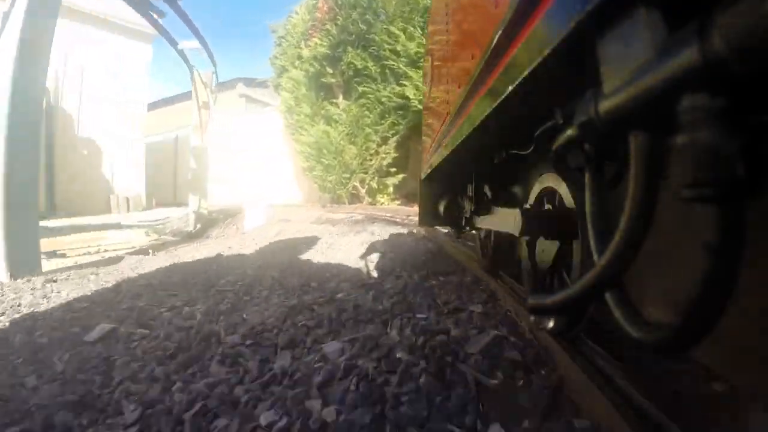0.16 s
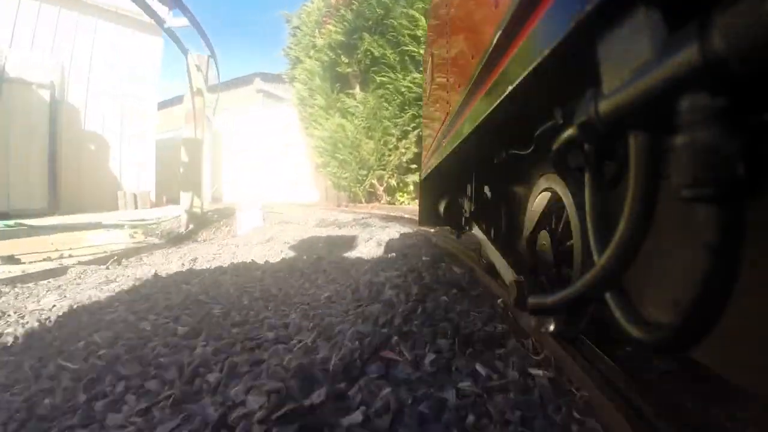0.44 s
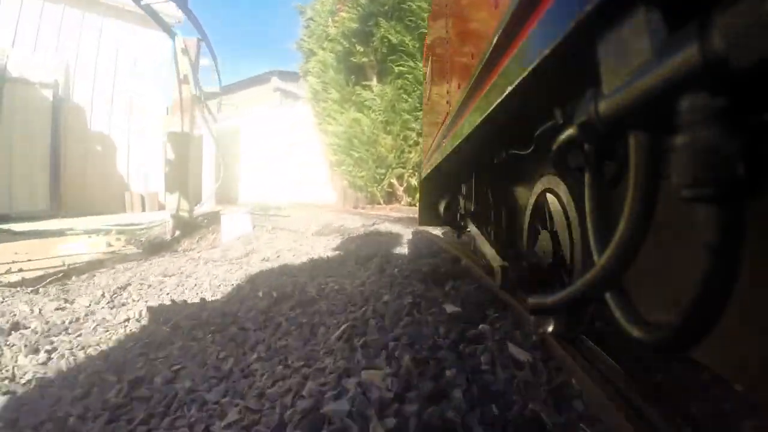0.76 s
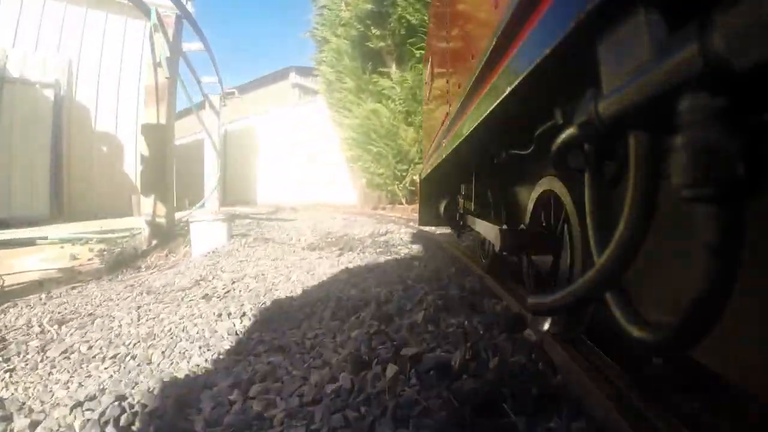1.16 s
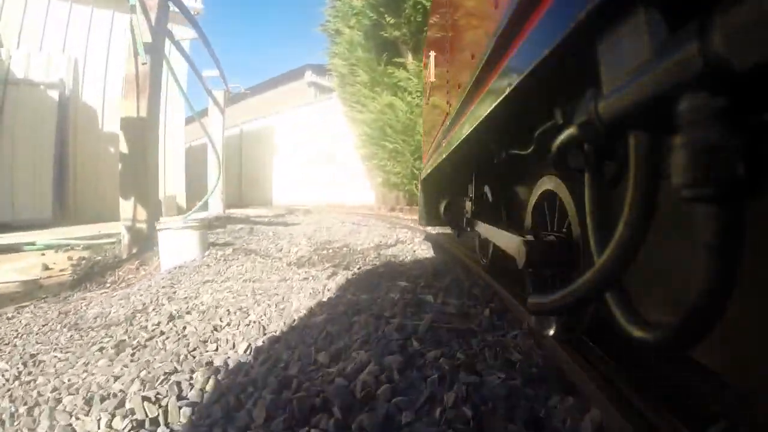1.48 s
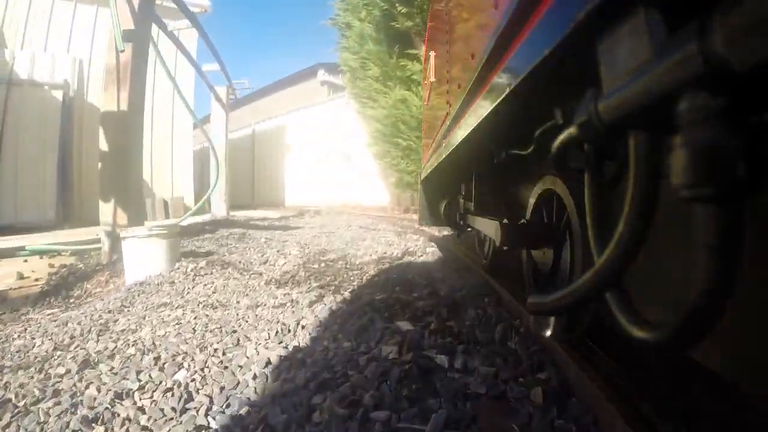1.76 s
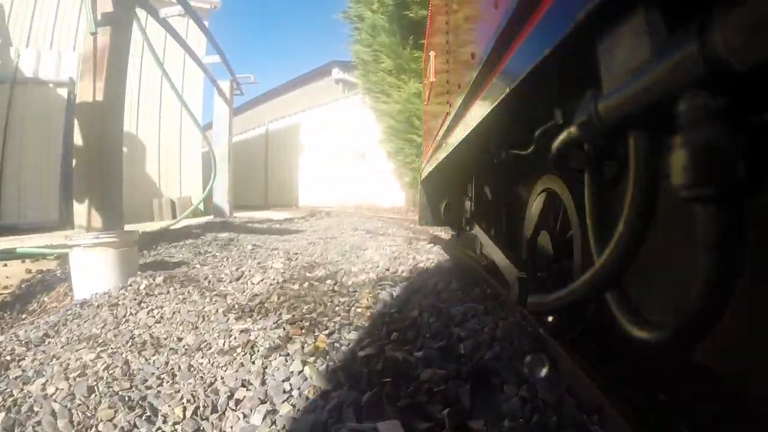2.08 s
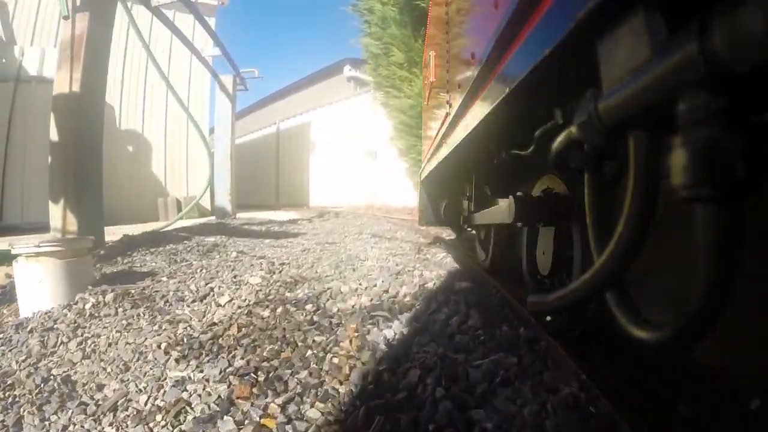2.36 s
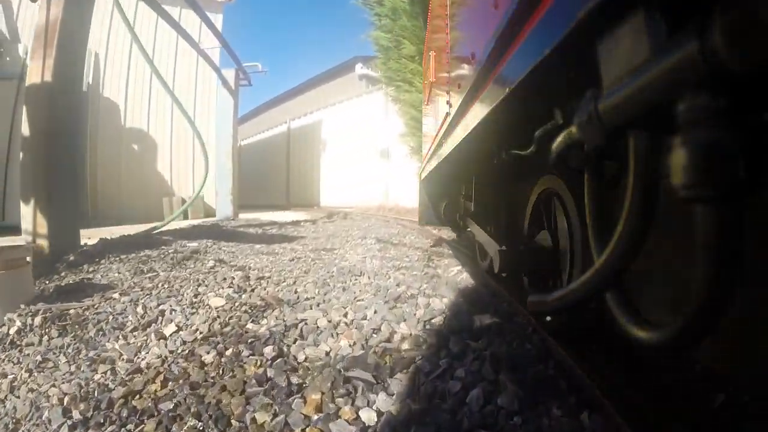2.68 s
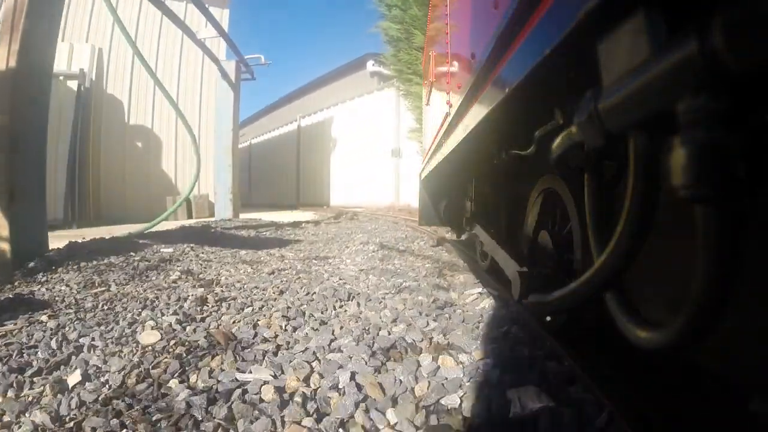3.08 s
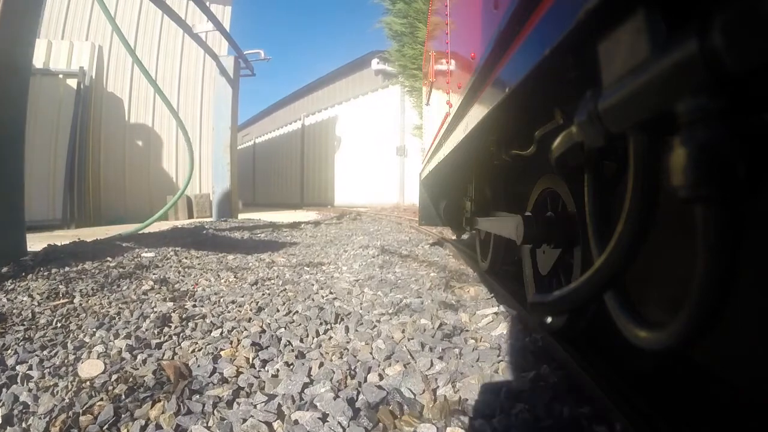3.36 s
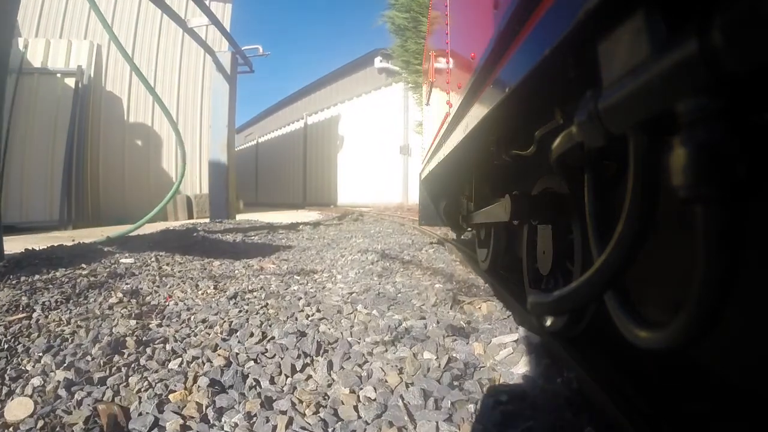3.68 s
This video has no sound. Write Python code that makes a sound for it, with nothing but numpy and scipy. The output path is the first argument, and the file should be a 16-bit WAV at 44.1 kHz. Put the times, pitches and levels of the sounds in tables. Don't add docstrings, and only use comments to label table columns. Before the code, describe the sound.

A miniature steam locomotive rolls along track, clanking and rumbling, with a faint muffled steam hiss later

```python
import sys
import numpy as np
from scipy import signal
from scipy.fft import rfft, irfft
from scipy.io import wavfile
from scipy.ndimage import uniform_filter1d

SR = 44100
rng = np.random.default_rng(int(sys.argv[2]) if len(sys.argv) > 2 else 0)


def store_pcm(level_fs):
    pcm = np.round(np.clip(level_fs, -1, 1) * 32767).astype(np.int16)
    wavfile.write(sys.argv[1], SR, np.atleast_2d(pcm).T)


def volts_from_decibels(level):
    exponent = np.asarray(level, float) / 20
    return 10 ** exponent


N = 168903
POINTS_END_S = 1.3

# f/Hz, level/dB, t60/s
FRAME_MODES = [(132, -4, 0.14), (220, -13.5, 0.48), (264, -6.5, 0.049), (293.6, 3.5, 0.085),
               (336.5, -7.5, 0.037), (394.4, -11, 0.069), (438.5, -5, 0.049), (505.3, -8.5, 0.13),
               (543, -16, 0.31), (639.4, -16.5, 0.19)]
# f/Hz, level/dB, t60/s
CASE_MODES = [(959, 2, 0.9), (1147, -1, 0.067), (1286, -5.5, 0.088), (1546, -3, 0.031),
              (1740, -16.5, 0.015), (1950, -1, 0.089), (2330, -16, 0.033), (2460, -2.5, 0.078),
              (3267, -12.5, 0.045), (3996, -13, 0.027), (4700, -22.5, 0.041), (5370, -8.5, 0.055)]
# t/s, steam level/dB, chatter level/dB
STEAM_AND_CHATTER = [
    (0, -68, -33.5),
    (.8, -71.5, -37),
    (1.3, -72, -42.5),
    (1.5, -71, -44),
    (2.2, -60.5, -41),
    (2.65, -61.5, -41.5),
    (3, -60, -44.5),
    (3.83, -59.5, -57),
]


def unit(x):
    return x / np.sqrt(np.mean(x ** 2))


def curve(rows, axis=1):
    rows = np.array(rows)
    return np.interp(np.arange(N) / SR, rows[:, 0], rows[:, axis])


def walk(rate_hz):
    k = int(SR / rate_hz)
    steps = np.repeat(rng.standard_normal(N // k + 3), k)
    slewed = uniform_filter1d(uniform_filter1d(steps, k), k)
    return unit(slewed[k:N + k])


def ring(x, hz, t60_s):
    r = np.exp(-np.log(1000) / (max(t60_s, .0012) * SR))
    w = 2 * np.pi * hz / SR
    return signal.lfilter([0, r * np.sin(w)], [1, -2 * r * np.cos(w), r * r], x)


def dull(x, hz, order=4, kind="low"):
    return signal.sosfilt(signal.butter(order, hz, kind, fs=SR, output="sos"), x)


def colour(x, tone, peaks=()):
    f = np.fft.rfftfreq(len(x), 1 / SR) + 1
    tone = np.array(tone)
    gain = volts_from_decibels(np.interp(np.log(f), np.log(tone[:, 0]), tone[:, 1]))
    gain = gain * np.clip(f / tone[0, 0], 0, 1) ** 2
    bumps = 1 + sum(volts_from_decibels(db) / (1 + (2 * (f - hz) / w) ** 2) for hz, w, db in peaks)
    return irfft(rfft(x) * gain * bumps, len(x))


def grit(per_s, spread_db):
    hit = rng.random(N) < per_s / SR
    return unit(hit * rng.standard_normal(N) * volts_from_decibels(spread_db * rng.exponential(size=N)))


def add(out, at_s, x):
    i = max(int(at_s * SR), 0)
    out[i:i + len(x)] += x[:N - i]


def mode_weights(count, spread_db):
    return volts_from_decibels(spread_db * rng.standard_normal((count, 16)))


def bursts(events, size, spread_db):
    t = np.arange(size) / SR
    noise = rng.standard_normal((len(events), size))
    weights = mode_weights(len(events), spread_db)
    for (s, db, length_s, *hz), n, w in zip(events, noise, weights):
        attack = np.minimum(t / 0.00054, 1)
        tail = 0.36 * np.exp(-t / (1.8 * length_s))
        shape = attack * np.clip(1.6 - 0.9 * t / length_s, 0, 1) + tail
        yield s, db, n * np.abs(n) ** 0.16 * shape, w, hz


def sway():
    # t/s, length/s, level/dB
    swing_spells = [(-.05, 0.21, -23.5), (0.714, 0.12, -24), (0.85, 0.13, -25), (1.07, 0.23, -32),
                    (1.568, 0.17, -27), (1.765, 0.19, -36), (2.168, 0.035, -22), (2.355, 0.17, -24.5),
                    (2.536, 0.17, -19.5), (2.802, 0.24, -21.5), (3.19, 0.099, -25), (3.32, 0.17, -25.5),
                    (3.483, 0.22, -30.5)]
    pitch_hz, wander_hz, rest_db, edge_s, flutter_db = 87, 2.28, -33, 0.036, 1.5
    t = np.arange(N) / SR
    spells = sum(volts_from_decibels(db) * ((t > s) & (t < s + length_s)) for s, length_s, db in swing_spells)
    size = volts_from_decibels(rest_db) * volts_from_decibels(3.7 * walk(8.7)) + uniform_filter1d(spells, int(edge_s * SR))
    phase = 2 * np.pi * np.cumsum(pitch_hz + wander_hz * walk(19)) / SR
    return np.sqrt(2) * np.sin(phase) * size * volts_from_decibels(flutter_db * walk(24.57))


def low_rise_db():
    return 3.5 * (np.arange(N) / SR - 1.9)


def rolling():
    # t/s, level/dB
    rolling_load = [
        (0, -16.5),
        (.5, -19),
        (1.05, -20),
        (1.2, -25),
        (1.5, -22.5),
        (2.1, -22),
        (2.8, -20),
        (3.15, -25.5),
        (3.83, -31.5),
    ]
    mode_flutter_db, roll_flutter_db, wheel_bumps_per_s = 1.0, 1.0, 120
    push = 0.62 * rng.standard_normal(N) + .35 * grit(wheel_bumps_per_s, 1.0)
    push = push * volts_from_decibels(curve(rolling_load) + roll_flutter_db * walk(17))
    rise_db = low_rise_db()
    out = np.zeros(N)
    for hz, db, t60_s in FRAME_MODES:
        level_db = db + mode_flutter_db * walk(10) + rise_db * (hz < 230)
        out += volts_from_decibels(level_db) * ring(push, hz, t60_s) * np.sqrt(30 / (t60_s * SR))
    return out * volts_from_decibels(-3.5)


def rumble():
    low = unit(dull(rng.standard_normal(N), 68, order=2))
    return volts_from_decibels(-44.5 + low_rise_db() + 2.8 * walk(16)) * low


def chatter():
    per_s, spread_db, flutter_db = 260, 1.2, 2
    shakes = uniform_filter1d(np.abs(grit(per_s, spread_db)), int(.003 * SR))
    level = volts_from_decibels(curve(STEAM_AND_CHATTER, axis=2) + 1.3 * walk(25))
    noise = rng.standard_normal(N) * (unit(shakes) + 1.21) * level
    out = np.zeros(N)
    for hz, db, t60_s in CASE_MODES:
        mode = ring(noise * volts_from_decibels(db + flutter_db * walk(14)), hz, t60_s * 0.19)
        out += mode * np.sqrt(30 / (t60_s * SR))
    return out * volts_from_decibels(-2.5)


def clanks():
    # t/s, peak level/dB, rattle length/s, f/Hz of main part
    point_clanks = [(.0528, -14, 0.0032, 1450), (.0977, -17, 0.0035, 2540), (.106, -18, 0.0048, 2440),
                    (.1195, -16, 0.0028, 2560), (.1286, -11.5, 0.0045, 2420), (.1316, -14, .008, 2000),
                    (.143, -20, 0.0046, 2560), (.1935, -34, 0.0031, 2600), (.2518, -11, 0.0018, 2460),
                    (.2887, -24, .005, 2070), (.3232, -19, 0.0067, 2010), (.362, -19, 0.012, 2710),
                    (.3701, -3, 0.0029, 2520), (.4638, -16.5, 0.0048, 1940), (.4823, -10.5, 0.0037, 2000),
                    (.5097, -21, 0.0034, 1900), (.5297, -3.5, 0.0044, 2557), (.546, -21, 0.0035, 2520),
                    (.5526, -11, 0.0053, 2550), (.6459, -12.5, 0.0058, 2540), (.6754, -17, .004, 1300),
                    (.6928, -20, 0.0087, 2530), (.7108, -6.5, 0.0037, 2570), (.7187, -5, 0.0028, 2540),
                    (.7866, -23.5, 0.0037, 1900), (.852, -19, 0.0073, 1970), (.8594, -16, 0.0075, 2570),
                    (.8804, -20, 0.0067, 2550), (.8889, -15, .008, 1990), (.9492, -17.5, 0.0037, 2600),
                    (.9607, -22, .005, 1920), (1.0136, -5.5, 0.0055, 2460), (1.0212, -4.5, 0.0016, 2646),
                    (1.0256, -1.5, 0.0032, 2554), (1.0422, -5, 0.0022, 2560), (1.066, -21, 0.0023, 2000),
                    (1.0874, -16.5, 0.0074, 2470), (1.1478, -18.5, .006, 1900),
                    (1.1882, -6.5, 0.0032, 2580), (1.2096, -21, 0.0051, 2600)]
    # t/s, peak level/dB, f/Hz
    plain_knocks = [(1.2456, -21, 2270), (1.281, -31, 2550), (1.335, -36, 1950), (1.381, -24.5, 1990),
                    (1.4206, -21.5, 2500), (1.5451, -28.5, 2520), (1.5704, -12.5, 2510),
                    (1.6465, -14, 2050), (1.8135, -14, 2450), (1.8657, -19.5, 2570), (1.8842, -16.5, 1570),
                    (1.9313, -27, 1910), (1.9726, -26, 2000), (1.9911, -18.5, 1940), (2.0669, -26, 1470),
                    (2.0798, -16.5, 1920), (2.2191, -31, 1960), (2.2311, -18.5, 2620), (2.254, -16.5, 1890),
                    (2.2824, -25, 2410), (2.3105, -23, 1920), (2.3423, -24, 2490), (2.386, -8.5, 2550),
                    (2.477, -22, 1490), (2.5399, -25, 1950), (2.5673, -20.5, 2600), (2.6155, -12, 2560),
                    (2.6396, -10, 2460), (2.703, -17.5, 1980), (2.7912, -19, 1510), (2.8841, -15.5, 2030),
                    (2.9803, -17.5, 2530), (3.0215, -23, 1980), (3.209, -21, 2540), (3.2969, -14, 1974),
                    (3.5306, -20, 1940), (3.5482, -14, 2430), (3.738, -21.5, 2510)]
    knock_s, mix_spread_db, detune = .003, 2.5, 0.017
    crack_db, part_db, thud_t60_s = -5, 3, .004
    events = point_clanks + [(s, db, knock_s, hz) for s, db, hz in plain_knocks]
    out = np.zeros(N)
    for s, db, burst, w, (part_hz,) in bursts(events, size=4000, spread_db=mix_spread_db):
        plain = s > POINTS_END_S
        case = np.zeros(len(burst))
        for g, o, (hz, mode_db, t60_s) in zip(w, w[::-1], CASE_MODES):
            mode = ring(burst, hz * (1 + detune * np.log(o)), min(t60_s, .07) * 0.92)
            case += g * volts_from_decibels(mode_db) * mode / np.sqrt(t60_s)
        crack = volts_from_decibels(crack_db + 1.8 * plain) * w[-1] * unit(ring(burst, 2900, 0.00083))
        part = volts_from_decibels(part_db - 4.5 * plain) * unit(ring(burst, part_hz, 0.026))
        thud = volts_from_decibels(-4 if plain else -16) * unit(ring(burst, 1200, thud_t60_s))
        x = unit(case) + crack + part + thud
        add(out, s - .0006, x / np.abs(x).max() * volts_from_decibels(db))
    return out


def ticks():
    # t/s, peak level/dB
    bright_ticks = [(0.074, -56.5), (0.1072, -47.5), (0.123, -36.5), (0.1335, -28.5), (0.145, -41.5),
                    (0.323, -40.5), (0.481, -48.5), (0.51, -41), (0.5184, -47.5), (0.5304, -44),
                    (0.5554, -39.5), (0.6922, -49.5), (0.7176, -44), (0.7336, -42.5), (0.8804, -46),
                    (0.9597, -41), (1.0882, -59.5), (1.148, -42.5), (1.2171, -57)]
    # t/s, peak level/dB before a 16 dB cut
    late_ticks = [
        (1.3505, -47.5),
        (1.6425, -42),
        (1.6927, -36.5),
        (1.8107, -31),
        (2.092, -33),
        (2.168, -48),
        (2.241, -33),
        (2.4564, -33),
        (2.6103, -30),
        (2.7004, -42),
    ]
    # t/s, peak level/dB
    dull_ticks = [
        (0.0521, -46),
        (0.3604, -45),
        (0.852, -52.5),
        (0.8646, -49),
        (1.0156, -42),
        (1.0192, -51),
        (1.0284, -44.5),
        (1.0442, -50),
    ]
    # f/Hz, level/dB
    tick_tone = [(2500, 2.5), (4800, 2.5), (6500, -12.5), (8800, -19.5), (12000, -32), (13500, -32.5),
                 (15000, -23.5)]
    tick_s, bracket_hz, bracket_t60_s, bracket_db = 0.0045, 1870, .12, -15
    bright = bright_ticks + [(s, db - 16) for s, db in late_ticks]
    events = [(s, db, tick_s) for s, db in bright + dull_ticks]
    out = np.zeros(N)
    for k, (s, db, burst, w, _) in enumerate(bursts(events, size=2000, spread_db=2.5)):
        x = dull(burst, 5100)
        if k < len(bright):
            top_ring = ring(burst, min(9000 * w[1], 15000), .004)
            x = x + (burst - x) * w[0] * 0.83 + 0.019 * top_ring
        add(out, s - .0012, x * volts_from_decibels(db))
    bracket = dull(ring(out, bracket_hz, bracket_t60_s), 2 * bracket_hz)
    return colour(out, tick_tone) * volts_from_decibels(17.5) + volts_from_decibels(bracket_db) * bracket


def thumps():
    # t/s, peak level/dB, f/Hz
    joint_knocks = [(0.069, 4, 546), (0.287, 2, 285), (0.387, 7, 305), (0.468, 9, 291), (0.495, -4, 263),
                    (0.529, -5, 298), (0.648, -0.5, 520), (0.779, -3, 304), (0.857, 4, 276),
                    (1.07, -2.5, 306), (1.398, -3, 309), (1.574, 3, 293), (1.648, 8, 293),
                    (1.873, 2.5, 282), (1.957, 1, 290), (2.051, 6, 294), (2.232, 4.5, 227.4),
                    (2.385, 5.5, 292.4), (2.475, -6, 279), (2.571, 0, 288), (2.64, 6, 289), (2.726, 2, 304),
                    (2.972, -2.5, 251), (3.212, 1.5, 272.4), (3.551, -8, 297)]
    body_db, ring_scale, spread_db = -4, .6, 4
    blow = np.zeros(6000)
    blow[:30] = 1
    out = np.zeros(N)
    for (s, db, hz), w in zip(joint_knocks, mode_weights(len(joint_knocks), spread_db)):
        swell = unit(ring(ring(blow, hz, 0.027), hz, 0.11))
        body = sum(g * volts_from_decibels(mode_db) * f * ring(blow, f, t60_s * ring_scale)
                   for g, (f, mode_db, t60_s) in zip(w, FRAME_MODES))
        x = swell + volts_from_decibels(body_db) * unit(body)
        add(out, s + 0.00032, x / np.abs(x).max() * volts_from_decibels(db - 9))
    return out


def raps():
    # t/s, peak level/dB, f/Hz
    footplate_raps = [(0.072, -1, 519), (0.163, -22, 495), (0.252, -8.5, 528), (0.291, -2.5, 450),
                      (0.328, -6.5, 412), (0.389, -15, 450), (0.463, -6.5, 503), (0.647, -21, 517),
                      (0.716, -12, 511), (0.853, -15.5, 493), (1.188, -20, 396), (1.709, -21, 511),
                      (2.234, -21, 417), (2.341, -16, 511), (2.385, -12, 382), (2.472, -9.5, 436),
                      (2.641, -1.5, 519), (2.726, -7, 447), (2.773, -16, 444), (2.975, -12.5, 546),
                      (3.549, -14.5, 522)]
    t60_s, level_db = 0.11, -2
    out, click = np.zeros(N), np.zeros(4000)
    click[:12] = 1 / 12
    for s, db, hz in footplate_raps:
        x = ring(click, hz, t60_s) + .7 * ring(click, 0.88 * hz, 0.02)
        add(out, s - .0008, x / np.abs(x).max() * volts_from_decibels(db + level_db))
    return out


def steam():
    # f/Hz, level/dB
    hiss_tone = [(900, -2.5), (2200, 3), (3900, -3), (4500, -14.5), (5400, -4), (6500, -16), (11000, -20),
                 (15500, -29)]
    # f/Hz, width/Hz, level/dB
    hiss_peaks = [(3990, 520, 2), (4970, 200, 5.5), (7610, 460, 6)]
    flicker_db = .7
    jet = rng.standard_normal(N) * volts_from_decibels(flicker_db * walk(18)) + 0.2 * grit(900, 1.5)
    return unit(colour(jet, hiss_tone, hiss_peaks)) * volts_from_decibels(curve(STEAM_AND_CHATTER) + 17.0)


def squeaks():
    # t/s, length/s, peak level/dB, start f/Hz, end f/Hz
    joint_squeaks = [
        (3.524, .024, -30, 2250, 1800),
        (2.644, .016, -29, 1500, 1100),
    ]
    out = np.zeros(N)
    for s, length_s, db, start_hz, end_hz in joint_squeaks:
        u = np.arange(int(length_s * SR)) / (length_s * SR)
        phase = 2 * np.pi * np.cumsum(start_hz + (end_hz - start_hz) * u) / SR
        add(out, s, volts_from_decibels(db) * np.sin(np.pi * u) * (np.sin(phase) + 0.5 * np.sin(phase / 2)))
    return out


def through_frame(x):
    return dull(dull(x, 611), 133, order=2, kind="high")


def through_case(x):
    return dull(dull(x, 3970, order=6), 1230, order=2, kind="high")


def scene():
    frame = through_frame(rolling() + thumps()) + rumble()
    rods = through_case(chatter() + clanks() + squeaks())
    return (sway() + frame + raps() + rods + ticks() + steam())[None, :]


def roll_off(x):
    return signal.sosfilt(signal.butter(12, 15710, fs=SR, output="sos"), x)


def record(dry):
    soft_clip, top_hz = .6, 15600
    mix = dull(np.tanh(soft_clip * dry) / soft_clip, top_hz, order=12)
    return roll_off(mix)


dry = scene()
out = record(dry)
store_pcm(out)
```